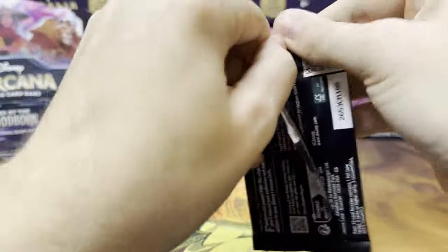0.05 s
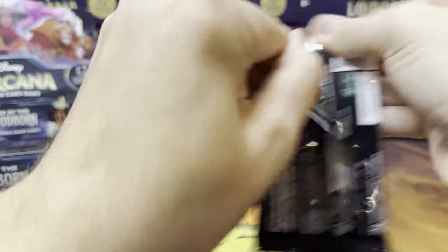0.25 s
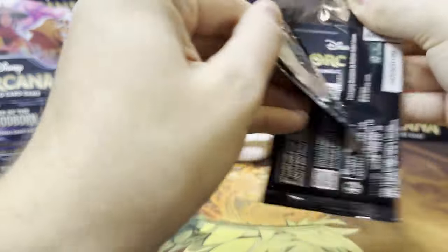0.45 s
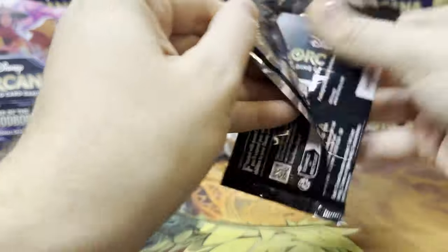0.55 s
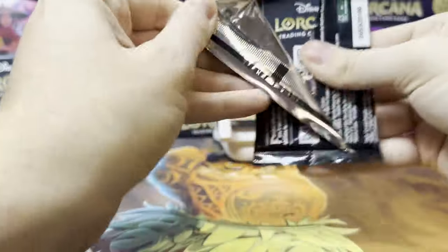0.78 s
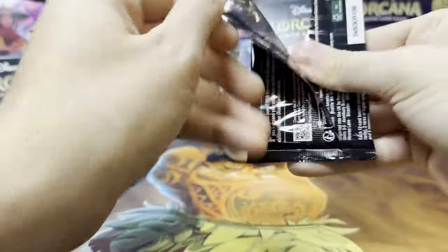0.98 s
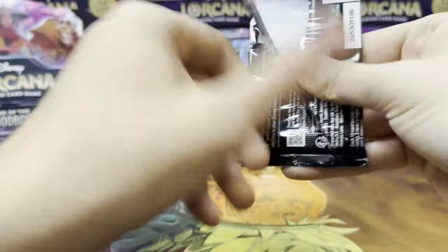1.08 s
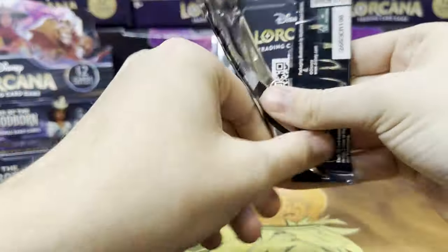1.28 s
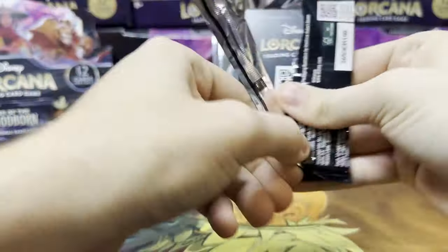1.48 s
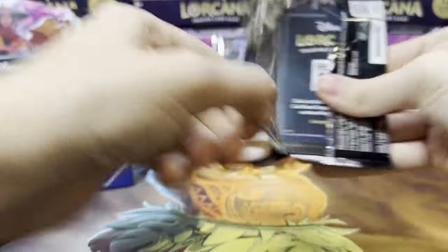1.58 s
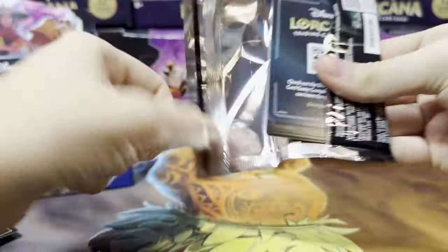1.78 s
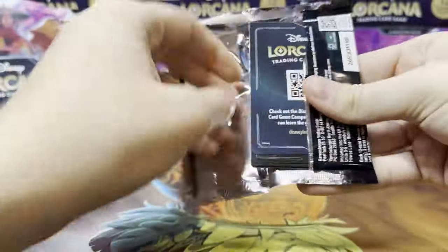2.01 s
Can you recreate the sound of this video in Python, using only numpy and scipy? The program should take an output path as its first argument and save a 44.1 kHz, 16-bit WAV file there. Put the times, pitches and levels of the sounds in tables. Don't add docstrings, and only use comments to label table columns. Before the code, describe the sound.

A foil card pack is opened by hand: light picking ticks, a sharp crack, sparse peeling crackles, a near pause, then a dense rip and soft handling. Close stereo phone microphone, quiet small room.

```python
import sys
import numpy as np
from scipy import signal
from scipy.fft import rfft, irfft, next_fast_len
from scipy.io import wavfile
from scipy.ndimage import map_coordinates

SR = 44100
rng = np.random.default_rng(int(sys.argv[2]) if len(sys.argv) > 2 else 0)


def waveform_to_disk(signal):
    frames = np.transpose(np.atleast_2d(signal))
    scaled = np.clip(frames, -1, 1) * 32767
    samples = np.round(scaled).astype(np.int16)
    wavfile.write(sys.argv[1], SR, samples)


def voltage_ratio(level):
    return 10 ** (np.asarray(level, float) / 20)


N = 90404


def unit(x):
    return x / np.sqrt(np.mean(x ** 2) + 1e-20)


def peak(x):
    return x / np.abs(x).max(axis=1, keepdims=True)


def along(points, hz):
    f, v = np.transpose(points)
    return np.interp(np.log(hz + 1), np.log(f + 1), v)


def wobble(rate):
    knots = rng.standard_normal(int(N * rate / SR) + 4)
    return map_coordinates(knots, [np.arange(N) * rate / SR])


def filtered(x, response):
    m = next_fast_len(N + SR // 2)
    return irfft(rfft(x, m) * response(np.fft.rfftfreq(m, 1 / SR)), m)[..., :N]


def place(s, sounds):
    where = np.round(s * SR).astype(int) + np.arange(sounds.shape[1])
    return np.bincount(where.ravel(), sounds.ravel(), N + SR)


# start in seconds, treble peak in dB, middle peak in dB, pouch peak in dB.
BIG_SNAPS = [(0.0293, -13.5, -36, -57), (0.045, -14.5, -31, -29), (0.0557, -25, -28.5, -64),
             (0.0627, -18, -25, -68), (0.0802, -12, -31, -47), (0.1087, -21, -40, -54),
             (0.164, -12, -38, -73), (0.1869, -13.5, -38, -47), (0.2164, 1, -20.5, -31),
             (0.2296, -19, -17.5, -51), (0.2405, -24, -15.5, -31), (0.2562, -8, -15, -19),
             (0.2758, 3, -13, -14), (0.293, -10, -12.5, -15), (0.3177, -14, -38, -56),
             (0.333, -20, -30, -30), (0.3511, -13, -25.5, -30.5), (0.3654, -34, -61, -55),
             (0.405, -31, -42, -38.5), (0.4254, -17, -44, -43.5), (0.4466, -53, -28.5, -35),
             (0.4574, -11.5, -32, -35.5), (0.4747, -9.5, -43, -56), (0.4892, -21, -23.5, -24),
             (0.4984, -13, -25.5, -61), (0.526, -33, -48, -32),
             (0.602, -15.5, -22.5, -31), (0.628, -42, -22.5, -33), (0.6663, -19, -34, -45),
              (0.708, -2, -20.5, -18.5), (0.7183, -8, -19.5, -21), (0.7385, -16, -64, -28),
              (0.7516, -19, -57, -51), (0.769, -14.5, -35, -27.5), (0.7936, -19.5, -36, -52),
              (0.8213, -21, -45, -66), (0.846, -18.5, -73, -65), (0.9106, -39, -38, -55),
              (0.9449, -17, -32.5, -36), (0.9537, -38, -47, -30), (0.9659, -30, -37, -42),
              (0.9777, -21.5, -25.5, -25.5), (0.9908, -44, -31.5, -31.5), (1.126, -72, -35, -81),
              (1.2019, -20, -34.5, -31), (1.32, -21.5, -33.5, -27), (1.3782, -49, -40.5, -30),
             (1.4468, -16, -41, -51), (1.4571, -15.5, -27, -48), (1.4654, -13.5, -35, -60),
             (1.4722, -23, -38, -43), (1.4817, -3.5, -21, -27.5), (1.4984, -25, -7, -54),
             (1.518, -9, -12.5, -49), (1.5371, -6, -16, -31), (1.5438, -5.5, -23, -18),
             (1.5757, -40, -12, -47), (1.5821, 0.5, -14.5, -11), (1.5897, -12, -19, -7.5),
             (1.5981, -7, -12.5, -20), (1.635, -6, -20, -7.5), (1.6548, -29, -29.5, -21),
             (1.674, -26, -27, -25), (1.7103, -16.5, -63, -31), (1.726, -3.5, -20, -12),
             (1.7438, -6.5, -25, -36), (1.768, -6, -19.5, -20.5), (1.7789, -1.5, -13.5, -25),
             (1.863, -28.5, -44, -49), (1.934, -26, -44.5, -37.5), (1.9825, -14.5, -34, -37),
             (2.0095, -20, -36.5, -28.5)]


def creases():
    treble_db, middle_db, pouch_db, rib_middle_db, pouch_mid_hz = -0.5, 8.5, 4, -17, 1110
    folds = np.array(BIG_SNAPS) + [0, treble_db, middle_db, pouch_db]
    rib_cracks = ribs()[:, [0, 1, 1, 2]] + [0, 0, rib_middle_db, -12]
    rows = np.concatenate([folds, rib_cracks])
    start, length, *_, centre_hz = np.transpose(PULLS)
    held_hz = np.interp(rows[:, :1], start + length / 2, centre_hz)
    return snaps(rows, np.sqrt(pouch_mid_hz * held_hz))


POUCH_MODES = [306, 540, 680, 937, 1132, 1620]


def pouch_ring(draw, centre_hz, t):
    scatter, slope_db_per_octave = 0.071, 8
    ring = 0
    for k, f in enumerate(POUCH_MODES):
        mode_hz = f * np.exp(scatter * draw[:, [-k - 2]])
        mode_db = 5.8 * draw[:, [-k - 9]] - slope_db_per_octave * np.abs(np.log2(f / centre_hz))
        ring = ring + np.sin(2 * np.pi * mode_hz * t) * voltage_ratio(mode_db)
    return ring


def snaps(rows, centre_hz, size=1536):
    treble_t60, middle_t60, pouch_t60 = .0032, 0.007, 0.013
    rise_s, life_scatter, middle_scatter = 0.00063, 0.41, .14
    spread_s = 0.001541
    s, treble_db, middle_db, pouch_db = np.transpose(rows)[:, :, None]
    t, hz = np.arange(size) / SR, np.fft.rfftfreq(size, 1 / SR)
    draw = rng.standard_normal((len(rows), 2 * size + 16))
    life = np.exp(life_scatter * draw[:, -1:])
    middle_hz = 3500 * np.exp(middle_scatter * draw[:, [-16]])

    def burst(x, t60, lo_hz, hi_hz):
        x = x * voltage_ratio(-60 * t / (t60 * life)) * (1 - np.exp(-t / rise_s))
        x = np.roll(x, 40, axis=1)
        band = 1 / (1 + (lo_hz / (hz + 1)) ** 6) / (1 + (hz / hi_hz) ** 6)
        return peak(irfft(rfft(x) * band, size))

    treble = burst(draw[:, :size], treble_t60, 5700, 16330)
    middle = burst(draw[:, size:2 * size], middle_t60, 0.59 * middle_hz, 1.58 * middle_hz)
    pouch = burst(pouch_ring(draw, centre_hz, t), pouch_t60, 259, 5200)
    mix = voltage_ratio(treble_db) * treble + voltage_ratio(middle_db) * middle + voltage_ratio(pouch_db) * pouch
    late = np.exp(-4j * np.pi * spread_s * np.sqrt(1000 * hz))
    return place(s, irfft(rfft(mix) * late, size))[60:N + 60]


# start in seconds, peak in dB, note in Hz.
POPS = [(0.02, -34.5, 1110), (0.045, -27.5, 750), (0.054, -22.5, 1800), (0.08, -40, 900),
        (0.239, -14, 1850), (0.272, -13, 1140), (0.292, -3.5, 985), (0.327, -28, 780), (0.405, -42, 877),
        (0.415, -38, 840), (0.447, -35.5, 470), (0.48, -35, 1014), (0.488, -41, 1030), (0.497, -36, 1200),
        (0.514, -26, 1160), (0.525, -24.5, 1160), (0.583, -38, 690), (0.597, -30.5, 890),
        (0.603, -16.5, 917), (0.654, -34, 870), (0.707, -17, 1126), (0.718, -20.5, 1214), (0.729, -34, 810),
        (0.739, -33, 517), (0.75, -33, 520), (0.767, -44, 495), (0.911, -25, 1840), (0.953, -50, 1170),
        (0.963, -24.5, 732), (0.991, -25.5, 1130), (1.001, -32, 1220), (1.126, -32, 1680),
        (1.2, -29.5, 1720), (1.275, -39, 944), (1.32, -23.5, 1136), (1.344, -36.5, 654), (1.377, -38, 1140),
        (1.475, -24, 1730), (1.518, -18.5, 760), (1.542, -11.5, 946), (1.583, -6.5, 1150),
        (1.597, -10, 540), (1.635, -13, 658), (1.652, -23, 686), (1.675, -22, 1180), (1.698, -31, 1620),
        (1.723, -16, 940), (1.745, -17, 1810), (1.778, -20.5, 586), (1.914, -40.5, 353), (1.936, -40, 740),
        (2.008, -30.5, 1160), (2.028, -40, 614), (2.04, -35, 600), (1.4, -33.5, 500), (.1655, -43, 810)]
# start in seconds, peak in dB, note in Hz.
TICKS = [
    (0.0064, -32, 3800),
    (0.4809, -19, 4000),
    (0.5146, -33, 3160),
    (0.532, -28, 3960),
    (0.5821, -32, 4360),
    (0.731, -37, 3060),
    (1.036, -35, 3100),
    (1.065, -33.5, 3340),
    (1.6084, -28, 2880),
]


def facets():
    pop_db, tick_db, pop_lag_s = 1.5, 4.5, .0015
    low = pops(np.add(POPS, [pop_lag_s, 0, 0]), cycles=11.4)
    low = low + pops(ribs()[:, [0, 2, 3]], cycles=5)
    return voltage_ratio(pop_db) * low + voltage_ratio(tick_db) * pops(TICKS, cycles=9.5)


def pops(rows, cycles, size=1536):
    rise_cycles, overtone, overtone_db, life_scatter = 0.92, 1.763, -5.5, .15
    s, db, hz = np.transpose(rows)[:, :, None]
    draw = rng.standard_normal((len(rows), 3))
    ratio = np.where((hz > 1400) & (hz < 2000), 1 / overtone, overtone) * np.exp(0.17 * draw[:, 1:2])
    turns = hz * np.arange(size) / SR
    partner = voltage_ratio(overtone_db + 5.2 * draw[:, :1]) * np.sin(2 * np.pi * turns * ratio)
    note = np.sin(2 * np.pi * turns) + partner
    life = cycles * np.exp(life_scatter * draw[:, 2:])
    note = note * voltage_ratio(-60 * turns / life) * (1 - np.exp(-turns / rise_cycles)) ** 2
    return place(s, voltage_ratio(db) * peak(note))[:N]


# start in seconds, first gap in seconds, gap growth
# as a ratio, treble in dB, pop in dB.
SEAM = [
    (.0674, .0062, 1.0, -27, -39),
    (.1163, .0066, 1.09, -26, -38),
    (.6732, .0047, 1.0, -14, -40),
    (.7875, .023, 1.0, -50, -32),
]


def ribs():
    counts, pop_hz = (8, 6, 6, 3), (900, 900, 750, 440)
    rows = []
    for (s, gap, grow, db, pop_db), count, hz in zip(SEAM, counts, pop_hz):
        for k in range(count):
            wait = gap * sum(grow ** j for j in range(k))
            rows.append((s + wait, db, pop_db, hz))
    return np.array(rows)


# start in seconds, length in seconds, strength in dB, dullness in dB, pouch centre in Hz.
PULLS = [(0, 0.09, -55, -1, 1230), (0.221, 0.074, -24.5, 1, 1620), (0.301, 0.061, -43, -3, 920),
         (0.471, 0.057, -38.5, 0.5, 980), (0.583, 0.049, -45, -4.5, 1030), (0.692, 0.026, -36.5, -0.5, 970),
         (0.72, 0.12, -41, -1.5, 435), (0.902, 0.12, -45.5, 1, 1070), (1.05, 0.097, -55.5, -3.5, 1390),
         (1.275, 0.098, -48.5, -1, 1160), (1.476, 0.051, -29, 0.5, 1400), (1.538, 0.062, -24, 1, 700),
         (1.631, 0.17, -39, 0.5, 780), (1.84, 0.22, -52.5, 6.5, 445)]
# frequency in Hz, level in dB.
FILM = [(300, -40), (500, -25), (1300, -5), (3500, 22), (7000, 29.5), (16000, -69)]


def swarm(count=140):
    swarm_db, middle_db, pouch_db, scatter_db, hiss_db, rumble_db = -1.5, -2, -6, 3.5, -5.5, -19.5
    attack_s, release_db_per_s = 0.0018, 591
    t = np.arange(N) / SR
    clump_db = 4 * wobble(59.816)
    rows, centres, pull = [], [], np.zeros(N)
    for s, length, db, dull_db, centre_hz in PULLS:
        def shape(x):
            fade_db = release_db_per_s * np.clip(x - s - length, 0, 1)
            return voltage_ratio(db - fade_db) * np.clip((x - s) / attack_s, 1e-4, 1)

        u = rng.random((count, 5))
        at = np.clip(s + u[:, 0] * (length + 0.032), 0, (N - 1) / SR)
        size_db = 20 * np.log10(shape(at)) + clump_db[(at * SR).astype(int)] + swarm_db
        size_db = size_db - scatter_db * np.log(.02 + u[:, 1])
        colour = 10 * (u[:, 2:] - .5) + [-dull_db, middle_db, pouch_db + dull_db]
        rows.append(np.column_stack([at, size_db[:, None] + colour]))
        centres += [[centre_hz]] * count
        pull += shape(t) * (t > s)
    hiss = unit(filtered(rng.standard_normal(N), lambda hz: voltage_ratio(along(FILM, hz))))
    rumble = unit(filtered(rng.standard_normal(N), lambda hz: (hz > 35) / (1 + (hz / 150) ** 2)))
    swell_db = np.interp(t, [1.5, 1.9], [0, 14])
    rub = voltage_ratio(hiss_db) * hiss + voltage_ratio(rumble_db + swell_db) * rumble
    return snaps(np.concatenate(rows), np.array(centres), size=1024) + pull * voltage_ratio(clump_db) * rub


# start in seconds, peak in dB.
THUMPS = [
    (0.221, -26.5),
    (0.656, -48),
    (1.15, -55.5),
    (1.21, -48.5),
    (1.558, -43),
    (1.662, -33.5),
    (1.741, -28),
    (1.797, -33.5),
    (2.029, -33.5),
]


def thumps():
    out, t = np.zeros(N + SR), np.arange(SR // 4) / SR
    cycles = 62.8 * (t + 0.91 * 0.011 * (1 - np.exp(-t / 0.0022)))
    push = np.sin(2 * np.pi * cycles) * (1 - np.exp(-t / 0.00047)) * voltage_ratio(3 - 60 * t / 0.062)
    for s, db in THUMPS:
        out[round(s * SR):][:len(t)] += voltage_ratio(db) * push
    return out[:N]


def echo(x, decay):
    hz, t, z = signal.stft(rng.standard_normal((2, SR // 3)), SR, nperseg=128)
    fade = voltage_ratio(-60 * t / along(decay, hz)[:, None])
    tail = signal.istft(z * fade, SR, nperseg=128)[1]
    return signal.fftconvolve(x[None], tail / np.linalg.norm(tail[0]), axes=1)[:, :N]


# frequency in Hz, share as a ratio.
APART = [(150, .12), (1200, .3), (4000, .8), (9000, .3)]


def hand_scatter(foil):
    scattered = echo(foil, [(1000, .008)])
    return filtered(scattered, lambda hz: along(APART, hz)) * [wobble(80), wobble(80)]


# frequency in Hz, t60 in seconds.
WALLS = [(300, 0.043), (3000, 0.18), (12000, 0.013)]


def room(foil):
    return voltage_ratio(-16) * filtered(echo(foil, WALLS), lambda hz: hz ** 2 / (hz ** 2 + 500 ** 2))


# frequency in Hz, density in dB per Hz.
AIR = [(18, -31), (30, -1), (1800, -3), (5300, -1.5), (8530, -2), (15200, -11), (16500, -62)]


def room_air():
    air = unit(filtered(rng.standard_normal((2, N)), lambda hz: voltage_ratio(along(AIR, hz)) * (hz > 45)))
    return voltage_ratio(-56.5) * (air + .5 * air[::-1])


def scene():
    foil = creases() + facets() + swarm()
    return foil + hand_scatter(foil) + thumps() + room(foil) + room_air()


def low_pass(x):
    return signal.sosfilt(signal.butter(12, 17140, fs=SR, output="sos"), x)


# frequency in Hz, level in dB.
MIC = [(7000, -6.5), (8800, 1.5), (10200, -0.5), (11300, -19.5), (12600, -7), (14200, -1.5), (15700, -1.5),
       (16600, -43)]
# frequency in Hz, lead of the left in radians.
PORT_LEAD = [(900, 0.16), (4300, 1.47), (7000, 1.27), (7900, 1.2), (10300, -2.5), (12500, -1.06)]
# frequency in Hz, left over right in dB.
PORT_BALANCE = [(60, -.5), (300, -3.5), (1300, -3), (5000, 1.4), (9000, 0)]


def record(dry):
    side = np.array([[.5], [-.5]])

    def ports(hz):
        level_db = along(MIC, hz) + side * along(PORT_BALANCE, hz)
        return voltage_ratio(level_db) * np.exp(1j * side * along(PORT_LEAD, hz))

    return low_pass(filtered(dry, ports))


dry = scene()
out = record(dry)
waveform_to_disk(out)
```